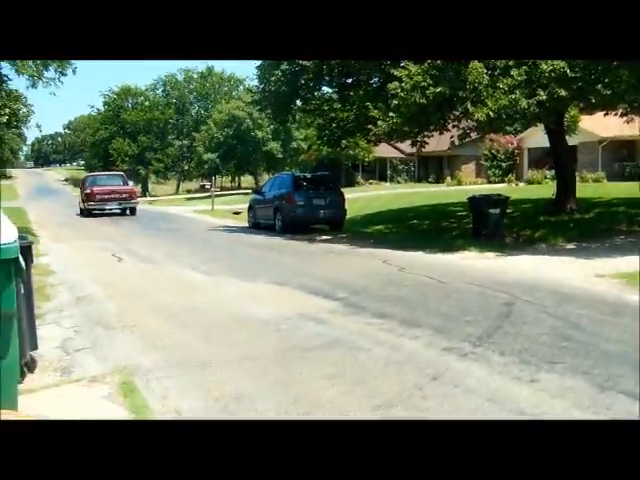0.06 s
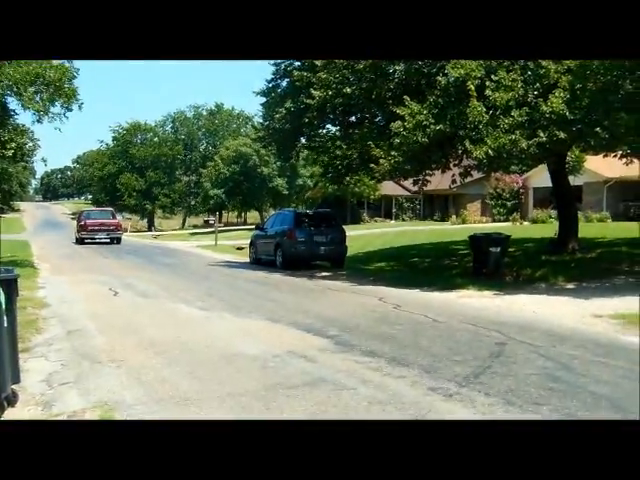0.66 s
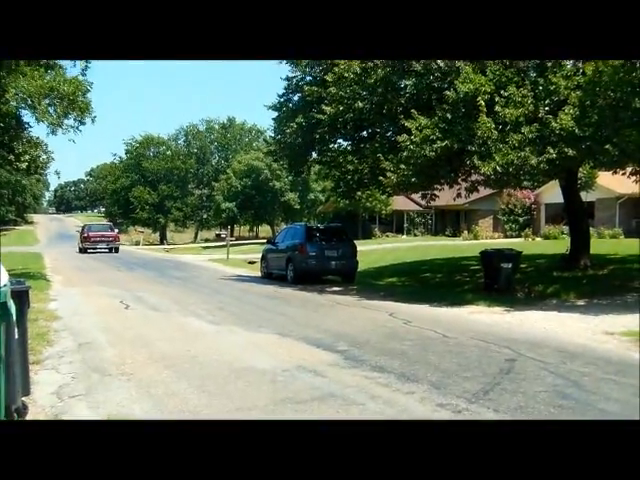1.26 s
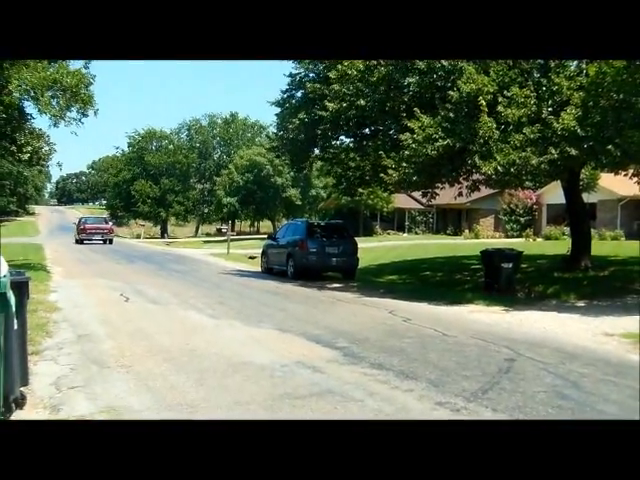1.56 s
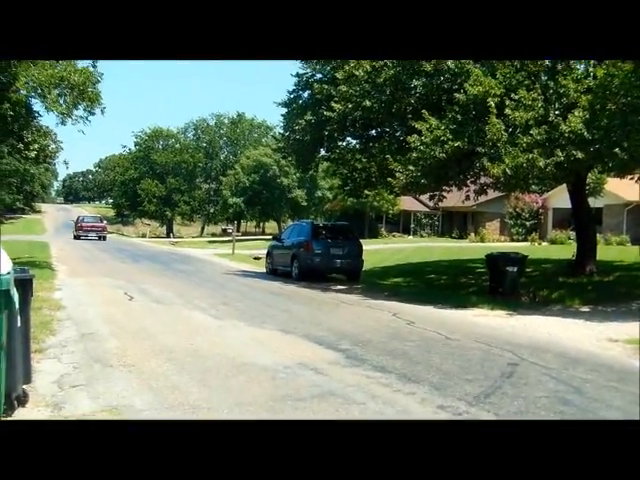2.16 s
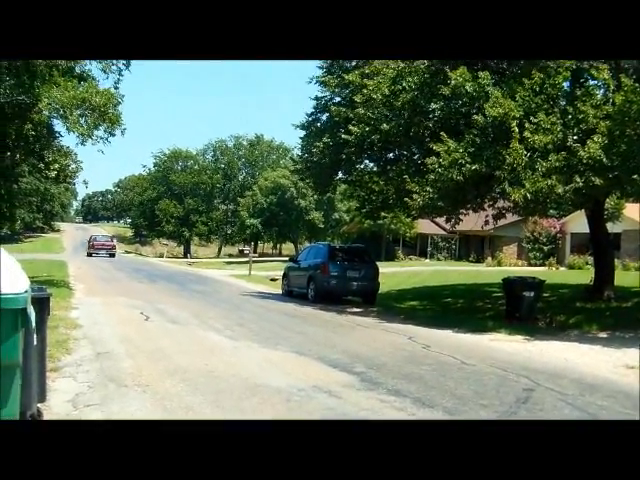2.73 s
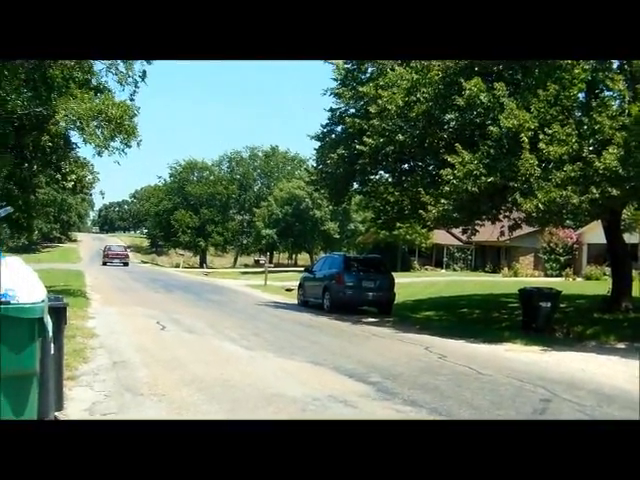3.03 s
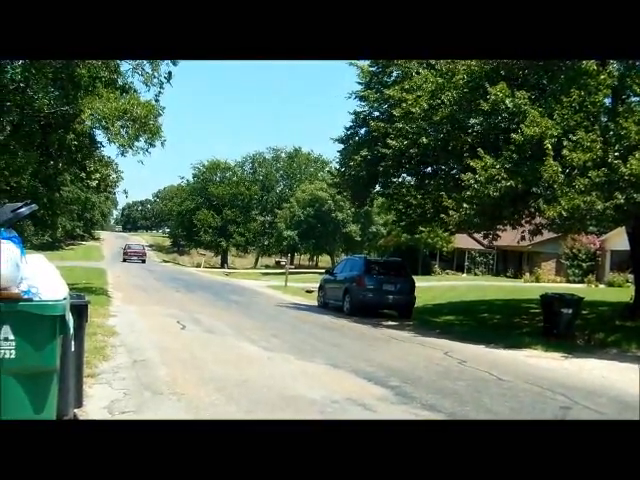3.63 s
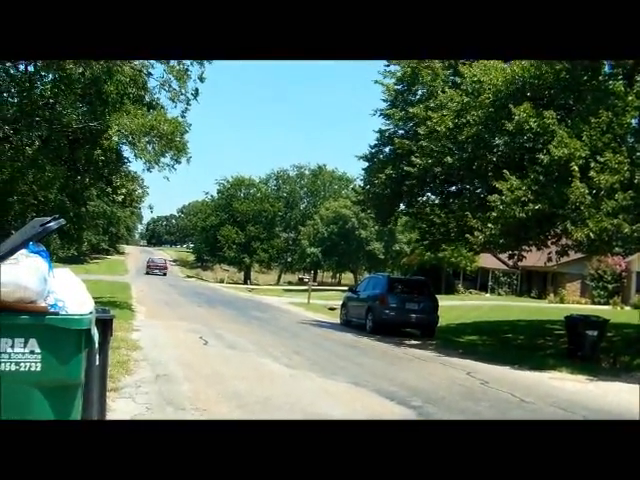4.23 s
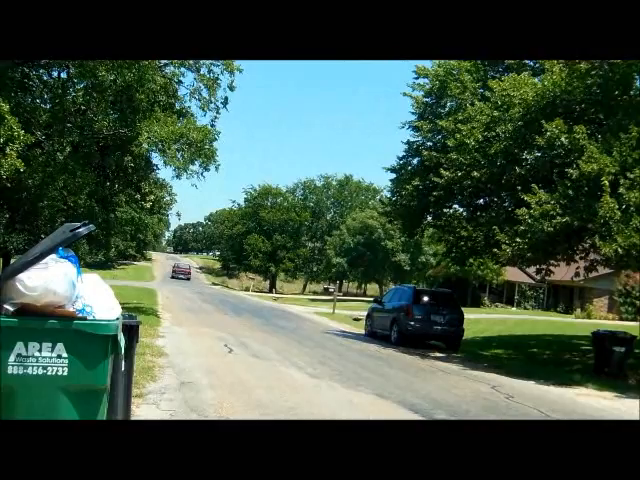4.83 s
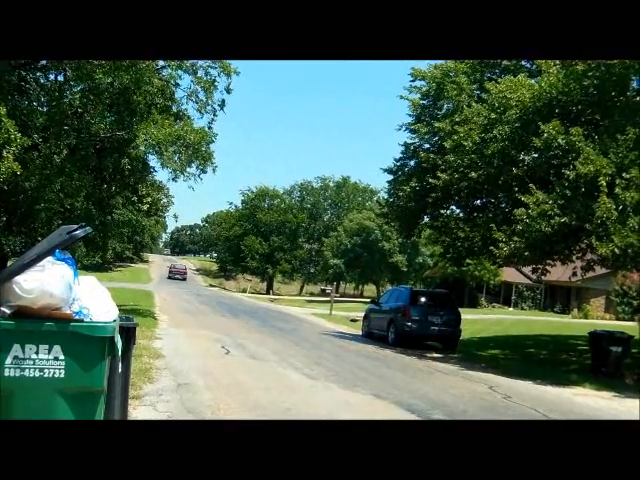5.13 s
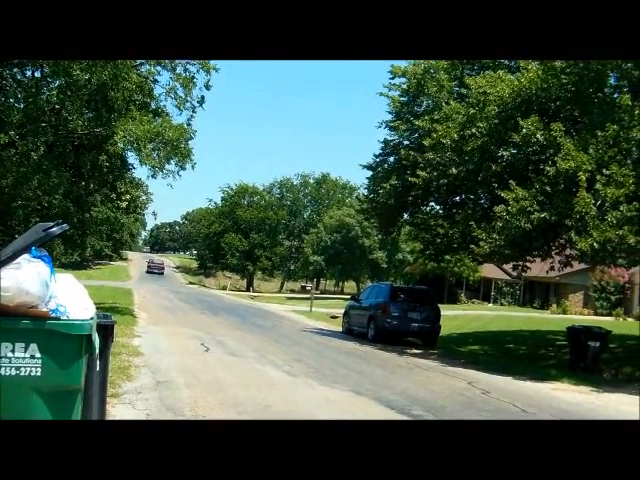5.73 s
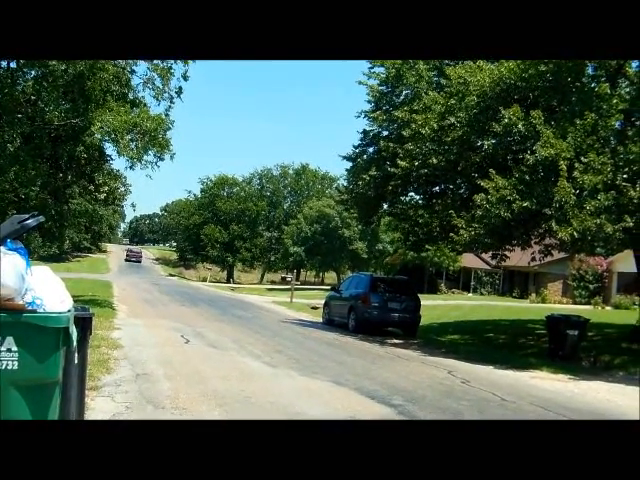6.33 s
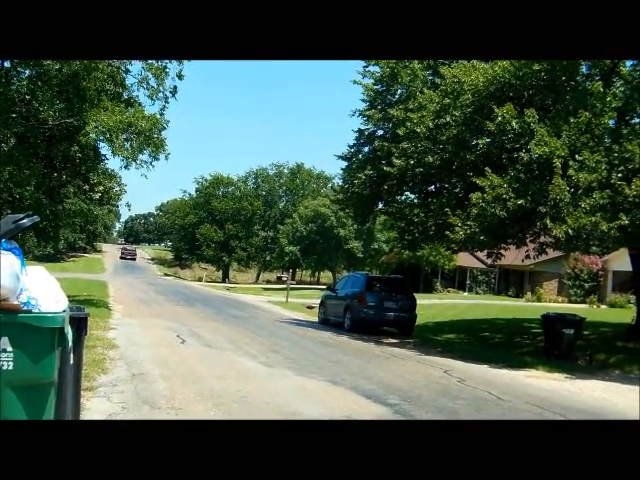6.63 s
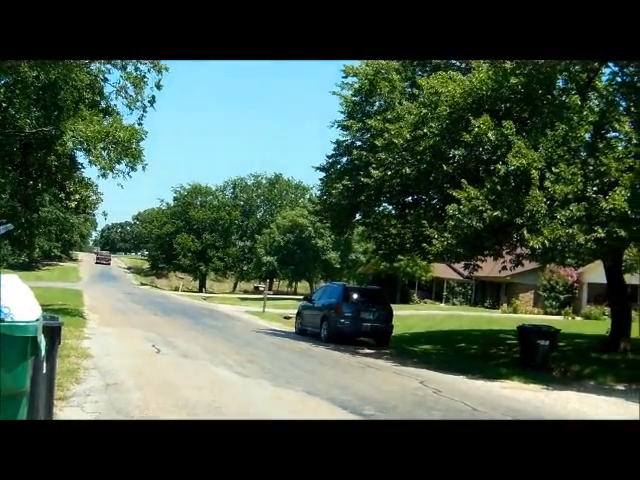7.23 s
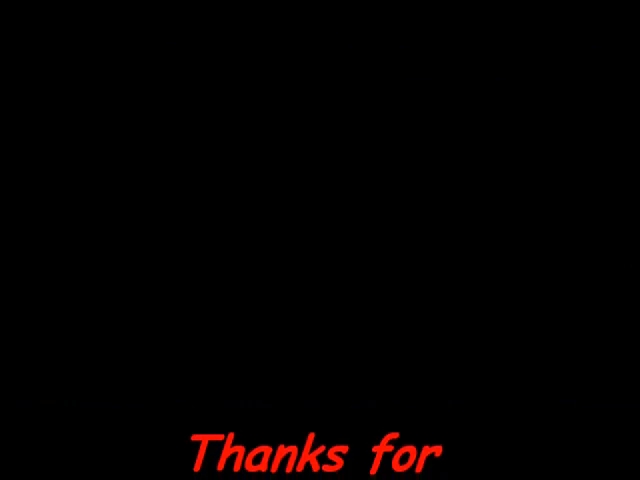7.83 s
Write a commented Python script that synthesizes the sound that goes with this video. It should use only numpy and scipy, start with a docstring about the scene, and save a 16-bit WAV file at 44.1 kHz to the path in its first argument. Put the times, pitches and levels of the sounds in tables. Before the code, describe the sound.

Heard on a hand-held microphone in a light breeze, a pickup runs roughly as it pulls away, with booming, uneven firings, sharp spits of gas and metallic rattling. About halfway through, the engine evens out and hums at higher revs, its turbo softly whistling. Houses along the street return a dull echo. Thin bird-like chirps and a sharp tick come near the abrupt end.

```python
"""A turbocharged V8 pickup drives away down a tree-lined street, heard from behind.
For four seconds the engine stutters, its exhaust chugging, barking and spitting; then it pulls cleanly
at higher revs. Uneven firings boom and ring in the pipe, gas hisses out and loose metal rattles.
Houses echo, faint chirps and ticks come through, and wind nudges the microphone of a hand-held camera.
At the end the sound cuts off."""
import sys
import numpy as np
from scipy import signal
from scipy.fft import rfft, irfft, next_fast_len
from scipy.io import wavfile
from scipy.ndimage import uniform_filter1d, minimum_filter1d

SR = 44100
rng = np.random.default_rng(int(sys.argv[2]) if len(sys.argv) > 2 else 0)


def persist_wave(psi):
    """Save psi, clipped to +-1, as 16-bit WAV."""
    counts = np.round(np.clip(psi, -1, 1) * 32767).astype(np.int16)
    wavfile.write(sys.argv[1], SR, np.atleast_2d(counts).T)


N = 356306
TIME = np.arange(N) / SR

# Engine speed. Each row: time in seconds, firings per second.
FIRING_RATE = [(0, 88.84), (.5, 88.7), (1.5, 84.83), (2.25, 89.33), (2.75, 86.42), (3.2, 88.62),
               (3.45, 92.28), (3.75, 89.18), (4.17, 98.97), (4.37, 94.35), (4.62, 102.49), (5.25, 109.02),
               (5.75, 109.52), (6.17, 103.34), (6.62, 108.15), (6.9, 106.09), (7.2, 103.38), (7.45, 105.06)]
# How roughly the engine runs. Each row: time in seconds, stutter from 0 (even) to 1 (ragged).
ROUGHNESS = [(0, 0.36), (0.301, 0.58), (1.1, 0.69), (2.15, 0.52), (2.9, 0.51), (3.5, 0.58), (4.4, 0.091),
             (4.75, 0.094)]
# How hard the engine works. Each row: time in seconds, effort in dB.
ENGINE_EFFORT = [(0, 2), (0.399, -1.5), (1, -1), (1.6, 1), (2.199, 3.5), (2.9, -1.5), (3.5, 3.5), (4.15, 2),
                 (4.7, -5.5), (6.1, -3.5), (6.35, -0.5), (6.7, 2.5), (7.1, 0), (7.45, 1)]
# The cylinders in firing order; their two banks reach the tailpipe unevenly.
# Each row: delay in firing intervals, boom in dB, rasp in dB.
CYLINDER_BEAT = [(-0.056, -0.5, -0.5), (0.0515, -0.5, -2.5), (-0.201, 3, 1.5), (0.042, -2, 2),
                 (0.0514, 1, -1), (-0.046, 4, 1.5), (0.254, -4.5, -0.5), (-0.097, 2.5, 2.5)]
# Extra hard firings. Each row: time in seconds, then bark, spit and clack, each in dB.
HARD_FIRINGS = [(.084, -46, -39, -44), (.184, -36, -41, -40), (.266, -45, -35, -36),
                (.364, -32.5, -37, -39), (.623, -42.5, -30, -41), (.711, -38.5, -33, -43.5),
                (.769, -31.5, -40.5, -37.5), (0.894, -27, -30.5, -36.5), (.961, -48.5, -28.5, -36.5),
                (1.037, -41, -32.5, -39.5), (1.079, -44, -29.5, -33.5), (1.153, -40, -36, -43),
                (1.326, -32, -33, -44), (1.368, -27.5, -37, -32), (1.519, -32, -36, -35.5),
                (1.558, -41, -37, -37), (1.638, -38.5, -30.5, -33), (1.744, -29, -35.5, -45),
                (1.78, -34.5, -45.5, -48.5), (1.926, -23.5, -32.5, -34), (1.968, -26, -40.5, -37),
                (2.107, -29, -34, -38), (2.287, -25.5, -31.5, -30), (2.368, -39, -33.5, -43),
                (2.467, -27, -41.5, -44), (2.55, -47, -33, -41), (2.646, -25, -28, -34),
                (2.835, -21, -33, -30.5), (2.92, -26, -35, -41), (3.106, -26.5, -51, -47),
                (3.295, -26.5, -39, -52), (3.4, -25, -41, -53), (3.465, -31, -39, -48),
                (3.645, -29, -52, -45), (3.752, -23, -38, -45), (3.81, -30, -34, -41)]
# The engine misses. Each row: time in seconds, dip in dB, half length in seconds.
MISFIRES = [(0.08, 6, 0.092), (.68, 3, .022), (0.863, 3.5, .02), (0.988, 3, 0.021), (1.225, 4.5, 0.018),
            (1.413, 5, 0.018), (1.652, 4.5, 0.037), (2, 4.5, .025), (2.562, 6.5, .009), (2.7, 2.5, 0.014),
            (3.014, 4.5, 0.0067), (3.233, 6, 0.04), (3.67, 3.5, 0.016), (3.92, 3, 0.028)]
# How the exhaust shapes one firing. Each row: frequency in Hz, gain in dB.
EXHAUST_SHAPE = [(25, -35.5), (60, -7.5), (80, -5.5), (100, 1.5), (122, -0.5), (145, 4), (175, 2),
                 (210, -8), (235, -8), (268, 1), (305, -11), (380, -28), (470, -32), (600, -35.5),
                 (1200, -47), (8000, -103.5)]
# Where the tailpipe rings. Each row: pitch in Hz, width in Hz, gain in dB.
PIPE_RINGS = [(374, 115, -1.5), (707.6, 43.4, 3), (785, 75, 2), (849, 63, 2), (1015, 89, -5)]
# The low tones of steady running, and the high ones that sing when the turbo is pushing (boost).
# Each row: multiple of the engine cycle rate (a cycle is eight firings), relative level in dB.
DRONE_TONES = [(3, -26), (4, -32.5), (5, -21), (6, -37), (7, -29), (8, -3), (9, -20.5), (10, -11.5),
               (11, -6), (12, -18.5), (13, -9.5), (14, -16.5), (15, -24.5), (16, -12), (17, -31.5),
               (18, -16), (19, -20.5), (20, -16.5), (21, -12), (22, -18.5), (23, -19.5), (24, -18.5),
               (25, -21), (26, -28.5), (27, -34), (28, -33), (36, -38.5), (37, -34), (38, -33), (40, -35.5)]
SINGING_TONES = [(51, -8.5), (52, 4), (53, -6.5), (54, -9), (58, -16), (60, -11), (65, 0), (66, -6.5),
                 (68, -7.5), (70, 0.5), (76, -11), (79, -7), (81, -5)]
# The clean hum at the firing rate, the once-a-cycle chug and the pipe's hollow note.
# Each row: time in seconds, base level in dB.
HUM_LEVEL = [(0, -42), (.35, -18), (.7, -32.5), (2.2, -35), (2.6, -23), (3.5, -19.5), (4.1, -26),
             (4.6, -24.5), (7.45, -32.5)]
CHUG_LEVEL = [(0, -32), (.55, -34), (.9, -29), (1.4, -30.5), (2.3, -25), (2.8, -29), (3.2, -28.5),
              (4.1, -27), (4.8, -31), (7.45, -24.5)]
HOLLOW_LEVEL = [(0, -20.5), (.4, -21), (1.1, -23.5), (2.2, -21.5), (3.3, -19), (3.8, -26), (4.4, -34),
                (4.8, -60)]
# The hollow note's two beats. Each row: place in the cycle in firing intervals, gain in dB.
HOLLOW_BEATS = [(4.5, 0), (7.3, -1.7)]
# Heavy chugs on that note. Each row: time in seconds, level in dB, half length in seconds.
HOLLOW_CHUGS = [(0.914, -19.5, 0.019), (1.331, -18, 0.027), (1.514, -19.5, .018), (1.928, -22, 0.011),
                (2.113, -22, 0.02), (2.294, -22, .012), (2.356, -20.5, 0.011), (2.432, -17.5, 0.011),
                (2.616, -20.5, 0.013), (2.838, -19, 0.018), (3.074, -18, 0.01), (3.12, -20, .013),
                (3.364, -21, .016), (3.424, -18, .014), (3.964, -20.5, 0.011)]
# Gas noise of a hard firing, of the stutter and of boost. Each row: frequency in Hz, gain in dB.
SPIT_SHAPE = [(600, 0.5), (1500, -0.5), (3000, 0.5), (4200, 5.5), (6000, 0.5), (7500, 1.5), (9800, 4.5),
              (11300, 0), (14000, -11)]
CHUFF_SHAPE = [(500, 3.5), (1000, 3.5), (1250, 6.5), (1550, 11.5), (2050, 1.5), (2500, 7), (2900, -0.5),
               (3250, 2), (4100, -1), (6600, -16.5), (9500, -13), (11300, -10.5), (14000, -26.5)]
HISS_SHAPE = [(300, 0), (1000, 11.5), (1250, 4.5), (1700, 6), (2150, 0.5), (2850, 0), (3400, 0), (3800, 1),
              (4250, 0.5), (5600, -1), (6600, -5), (10300, -5.5), (14000, -17.5)]
# Ringing loose metal, and the turbo's breath. Each row: pitch in Hz, width in Hz, relative level in dB.
METAL_RINGS = [(1540, 180, -5), (2552, 150, 3.5), (3240, 220, 0), (4035, 170, 0), (5230, 300, -3.5)]
TURBO_BANDS = [(1780, 340, -3), (2280, 530, 0), (3334, 380, 1), (4150, 190, -2.5)]
# Faint chirps. Each row: time in seconds, level in dB, pitch in Hz, half length in seconds.
FAINT_CHIRPS = [(.095, -41, 2580, 0.026), (6.255, -37, 3460, 0.012), (6.557, -38.5, 3470, .01),
                (6.685, -40.5, 3300, .01), (6.735, -40, 3360, .01), (6.815, -36.5, 3330, 0.016),
                (7.042, -38.5, 3290, .01), (7.085, -38.5, 3460, .01)]
# The wind's rumble. Each row: frequency in Hz, gain in dB.
WIND_SHAPE = [(3, -42), (14, -7), (25, -1.5), (50, 5), (100, 7), (300, -18.5), (1000, -44.5)]
# Gusts. Each row: time in seconds, strength in dB, half length in seconds.
WIND_GUSTS = [(.42, -46, 0.17), (1.307, -33, 0.033), (1.59, -28, 0.086), (1.976, -26, 0.26),
              (3.026, -22.5, 0.052), (3.42, -24, 0.17), (4.526, -21.5, 0.066), (5.55, -23, 0.11),
              (5.775, -23.5, 0.054), (7.161, -26, 0.046)]
# Sharp ticks. Each row: start in seconds, level in dB, pitch in Hz, width in Hz, decay in seconds.
SHARP_TICKS = [(4.865, -34, 7950, 600, 0.014), (4.94, -30, 7770, 700, 0.013),
               (7.28, -16, 8500, 7000, 0.0013)]

BOOM_DB, RASP_DB, HISS_DB = -12.9, -31.5, -32.5  # base levels, before effort and stutter
THROB_DB, SING_DB, WHISTLE_DB = -30, -33.5, -38.5  # base levels of the sounds that come with boost


def truck(bark_hz=845, turbulence=1.87, puff_s=.017):
    """Firings boom and ring in the exhaust, and a puff of gas follows each. Effort drives the levels."""
    firing_hz, stutter, effort_db = curve(FIRING_RATE), curve(ROUGHNESS), curve(ENGINE_EFFORT)
    sag_db = -sum(depth_db * swell(s, length) for s, depth_db, length in MISFIRES)
    boom_db = BOOM_DB + .25 * effort_db + sag_db - 4.5 * stutter
    rasp_db = RASP_DB + .72 * effort_db + .87 * sag_db - 3 * stutter
    hiss_db = HISS_DB + .3 * effort_db + .74 * sag_db
    # a running count of firings; the crank turns less evenly in the stutter
    fired = -.87 + np.cumsum(firing_hz) / SR + .018 * np.sqrt(stutter) * drift(25)
    bark, spit, clack, push = hard_firings()
    thumps, cracks = firings(fired, stutter, surge=np.sqrt(bark / bark.max()))
    boom = exhaust_boom(thumps, fired, stutter) * from_db(boom_db) + hollow_note(fired, sag_db)
    chug = whoop(fired, firing_hz, at=.094, hz=342, rise_hz_per_s=3800, half_s=.0096,
                 phase_spread=.22 + stutter)
    chug *= np.hypot(from_db(curve(CHUG_LEVEL) + 2 * sag_db), push)
    throb = whoop(fired, firing_hz, at=1.1, hz=893, rise_hz_per_s=2700, half_s=.0086, phase_spread=.56)
    throb *= from_db(THROB_DB + .7 * effort_db)
    puffs = level_out(add_tail(cracks, puff_s))
    blast = level_out(cracks) + turbulence * puffs * rng.standard_normal(N)
    # high tones swell as the revs carry them to a pitch where the pipe rings
    song = normalize(tailpipe(engine_tones(fired, SINGING_TONES, waver_db=2)))
    song *= from_db(SING_DB + .41 * effort_db)
    rasp = level_out(tailpipe(blast)) * np.hypot(from_db(rasp_db), bark * from_db(-7.5))
    bark_ring = tone(bark_hz, wobble=.02785, rate=130) * bark * from_db(-2)
    boost = 1 - stutter
    pipe = boom + chug + rasp + bark_ring + (song + throb) * boost ** 3
    gas = exhaust_gas(puffs, stutter, hiss_db, spit)
    return pipe + gas + rattle(puffs, stutter, clack) + turbo(effort_db, boost, puffs)


def firings(fired, stutter, surge, jitter=.062, surge_db=3):
    """Eight cylinders fire in turn, less evenly in the stutter. Gives pulses for boom and for rasp."""
    number = np.arange(int(fired[-1]) - 1)
    lag, boom_db, rasp_db = np.array(CYLINDER_BEAT)[number % len(CYLINDER_BEAT)].T
    time_luck, strength_luck, rasp_luck = rng.standard_normal((len(number), 3)).T
    ragged, hard = np.interp(number, fired, stutter), np.interp(number, fired, surge)
    at = np.interp(number + lag + jitter * np.sqrt(ragged) * time_luck, fired, np.arange(N))
    strength_db = (1 + 5 * np.sqrt(ragged)) * np.minimum(strength_luck, .6) + surge_db * hard
    thumps = from_db(strength_db + boom_db * (1 + ragged))
    cracks = from_db(strength_db / 3 + rasp_db * (1.5 - .67 * ragged) + 2.5 * rasp_luck)
    # each pulse is shared between the two nearest samples
    whole, part = at.astype(int), at % 1
    return [np.bincount(whole, size * (1 - part), N) + np.bincount(whole + 1, size * part, N)
            for size in (thumps, cracks)]


def hard_firings(bark_lag_s=.0045, push_lag_s=.015):
    """Loudness curves for a hard firing's round bark, spit of gas, metal clack and push on the chug."""
    bark = spit = clack = push = 0
    for s, bark_db, spit_db, clack_db in HARD_FIRINGS:
        bark += from_db(bark_db) * swell(s + bark_lag_s, .0105)
        spit += from_db(spit_db) * flare(s, rise_s=.002, decay_s=.0135)
        clack += from_db(clack_db) * flare(s, rise_s=.002, decay_s=.018)
        push += from_db(bark_db) * swell(s + push_lag_s, .02)
    return bark, spit, clack, push


def exhaust_boom(thumps, fired, stutter, settle_below=.25):
    """The exhaust's low voice: lumpy thumps give way to a clean drone as the stutter dies down."""
    lumps = level_out(colour(thumps, EXHAUST_SHAPE))
    lumps *= stutter ** .6 * np.minimum(stutter / settle_below, 1)
    drone = engine_tones(fired, DRONE_TONES, waver_db=3) * (1 - stutter) * from_db(-2.5)
    # the pipe lifts whichever tone passes through its resonance, more so under load
    drone += resonate(drone, hz=272, width=9) * from_db(-5 + .3 * curve(ENGINE_EFFORT))
    hum = np.sqrt(2) * np.cos(2 * np.pi * fired) * from_db(curve(HUM_LEVEL) - BOOM_DB)
    return -level_out(lumps + drone + hum)


def engine_tones(fired, table, waver_db, smear=.06):
    """Clean multiples of the engine cycle, timed by the cylinders' uneven beat. Weak ones waver most."""
    lag, boom_db, _ = np.transpose(CYLINDER_BEAT)
    count = len(CYLINDER_BEAT)
    moments = (np.arange(count) + lag) / count
    cycle, out = fired / count, 0
    for multiple, db in table:
        phase = np.angle(np.sum(from_db(boom_db) * np.exp(-2j * np.pi * multiple * moments)))
        # the pipe smears the timing of tones above twice the firing rate
        phase -= smear * max(multiple - 2 * count, 0) ** 2
        drift_db = waver_db * np.clip(.3 - db / 20, .3, 1) * drift(9)
        out += from_db(db + drift_db) * np.cos(2 * np.pi * multiple * cycle + phase)
    return normalize(out)


def hollow_note(fired, sag_db, hz=265, beat_width=.92):
    """The uneven banks sound the pipe's hollow note twice a cycle; heavy chugs boom on it too."""
    count, beats = len(CYLINDER_BEAT), 0
    for at, db in HOLLOW_BEATS:
        firings_away = (fired - at + count / 2) % count - count / 2
        beats += from_db(db) * np.exp(-.5 * (firings_away / beat_width) ** 2)
    beats *= from_db(curve(HOLLOW_LEVEL) + sag_db)
    heavy = sum(from_db(db) * swell(s, length) for s, db, length in HOLLOW_CHUGS)
    return tone(hz, wobble=.02006, rate=40) * np.hypot(beats, heavy)


def whoop(fired, firing_hz, at, hz, rise_hz_per_s, half_s, phase_spread, scatter_db=2):
    """A short rising ring of the exhaust, `at` firings into every cycle, a bit different each time."""
    count = len(CYLINDER_BEAT)
    cycle, place = np.divmod(fired - at + count / 2, count)
    age = (place - count / 2) / firing_hz
    phase_luck, level_luck = rng.standard_normal((N // 1000, 2))[cycle.astype(int)].T
    phase = 2 * np.pi * (hz + rise_hz_per_s * age / 2) * age + phase_spread * phase_luck
    loudness = from_db(scatter_db * level_luck) * np.exp(-.5 * (age / half_s) ** 2)
    return np.sqrt(2) * loudness * np.cos(phase)


def tailpipe(x):
    """The metal pipe rings at a few pitches and muffles what lies between them."""
    return sum(from_db(db) * resonate_twice(x, hz, width) for hz, width, db in PIPE_RINGS)


def exhaust_gas(puffs, stutter, hiss_db, spit, sputter_db=-48.5):
    """Gas leaves the pipe in puffs: it chuffs and spits in the stutter and hisses under boost."""
    # the highest noise is the least alike in left and right
    gas = stereo_noise([(400, -13), (1000, -19.5), (2000, -17), (4000, -5.5), (12000, -2)])
    gas *= level_out(puffs + .94)  # puffs on top of a smooth flow
    chuff, hiss, crack = (normalize(colour(gas, shape))
                          for shape in (CHUFF_SHAPE, HISS_SHAPE, SPIT_SHAPE))
    # the top of the hiss wanders by about 1 dB
    hiss += resonate(hiss, hz=9000, width=6000) * (from_db(drift(4)) - 1)
    flow = stutter * driving_off(start_db=1) * chuff + (1 - stutter) * from_db(3) * hiss
    # each spit is a cluster of fine crackles; stray sputters fall in between
    spits = spit * from_db(3) * crackle(per_s=1600, decay_s=.0022, scatter_db=2.5)
    sputter = stutter * from_db(sputter_db) * crackle(per_s=30, decay_s=.0064, scatter_db=1.5)
    return flow * from_db(hiss_db) + crack * (spits + sputter)


def rattle(puffs, stutter, clack):
    """Ragged firings shake loose metal into short rings; hard firings make it clack."""
    knocks = rng.standard_normal((2, N)) * puffs
    rings = flickering_bands(knocks, METAL_RINGS, flicker_db=3, rate=13)
    return rings * stutter * np.hypot(driving_off(start_db=-41), clack * from_db(8))


def turbo(effort_db, boost, puffs):
    """The turbo's breathy, pulsing whistle grows with effort once the boost is up."""
    air = stereo_noise([(2000, -8), (4000, -3)]) * puffs
    whistle = flickering_bands(air, TURBO_BANDS, flicker_db=1, rate=14)
    return whistle * boost ** 2 * from_db(WHISTLE_DB + effort_db)


def driving_off(start_db, db_per_s=-2.14):
    """A falling gain: the chuffing and rattling fade as the truck drives away."""
    return from_db(start_db + db_per_s * TIME)


def street(x, echo_db=-16, die_away_s=.51, dull_hz=1500, count=60):
    """House fronts, trees and a parked car throw back scattered, dull echoes."""
    delay, size = rng.uniform(.013, .35, count), rng.standard_normal(count)
    echoes = np.bincount((delay * SR).astype(int), size * from_db(-60 * delay / die_away_s))
    wet = signal.fftconvolve(x, echoes[None] / np.linalg.norm(echoes), axes=-1)[:, :N]
    return x + from_db(echo_db) * signal.sosfilt(signal.butter(1, dull_hz, fs=SR, output="sos"), wet)


def wind(rumble_db=-1, knock_db=-17):
    """A breeze rumbles on the microphone, and the hardest gusts knock on it."""
    calm_db = -12 * swell(6.5, .62)  # one calm spell near the end
    breeze = from_db(-25 - 3.5 * drift(5.6) + calm_db)
    gusts = sum(from_db(db) * swell(s, length) for s, db, length in WIND_GUSTS)
    rumble = normalize(colour(stereo_noise([(20, -23.5), (200, -8.5)]), WIND_SHAPE))
    rumble *= np.hypot(breeze, gusts) * from_db(rumble_db)
    knock_shape = [(4, -34.5), (18, 1), (45, -13), (120, 1.5), (300, -15), (900, -36.5), (3000, -54)]
    knocks = normalize(colour(stereo_noise([(20, -10), (300, -16)]), knock_shape))
    return rumble + knocks * (gusts / gusts.max()) ** 2 * from_db(knock_db)


def chirps():
    """Thin, bird-like chirps: short swells of a wobbling note."""
    return sum(from_db(db) * swell(s, length) * tone(hz, wobble=.022, rate=500)
               for s, db, hz, length in FAINT_CHIRPS)


def ticks():
    """Bright ticks: bursts of high noise that die away at once."""
    out = 0
    for s, db, hz, width, decay in SHARP_TICKS:
        shape = (TIME >= s) * np.exp(-np.abs(TIME - s) / decay)
        out += from_db(db) * shape * normalize(resonate(rng.standard_normal((2, N)), hz, width))
    return out


def microphone(x, lag_samples=.64, right_louder_db=.84):
    """The sound reaches the right side a moment after the left, and slightly louder."""
    size = next_fast_len(N + 2)
    delay = np.exp(-2j * np.pi * np.fft.rfftfreq(size) * lag_samples)
    right = irfft(rfft(x[1], size) * delay, size)[:N]
    return np.array([x[0] * from_db(-right_louder_db / 2), right * from_db(right_louder_db / 2)])


def from_db(db):
    """Turn decibels into a gain."""
    return 10 ** (np.asarray(db) / 20)


def curve(table):
    """Join (seconds, value) rows with straight lines, giving a value for every sample."""
    return np.interp(TIME, *np.transpose(table))


def normalize(x):
    """Scale to an average level (rms) of 1."""
    return x / np.sqrt(np.mean(x ** 2))


def level_out(x):
    """Hold the level near 1 over every half second, keeping the quick throb."""
    return x / np.sqrt(uniform_filter1d(x ** 2, SR // 2) + 1e-18)


def colour(x, points, size=8192):
    """Filter a sound so that its lows and highs follow the (Hz, dB) points."""
    hz, db = np.transpose(points)
    log_hz = np.log(np.fft.rfftfreq(size, 1 / SR) + 1)
    log_gain = np.log(from_db(np.interp(log_hz, np.log(hz), db)))
    # these steps make the filter ring only after a sound, never before it
    cepstrum = irfft(log_gain)[:size // 2]
    cepstrum[1:] *= 2
    response = irfft(np.exp(rfft(cepstrum, size)))
    return signal.fftconvolve(x, response.reshape((1,) * (x.ndim - 1) + (-1,)), axes=-1)[..., :N]


def resonate(x, hz, width):
    """Keep the sound near one pitch; the width is in Hz."""
    return signal.lfilter(*signal.iirpeak(hz, hz / width, fs=SR), x)


def resonate_twice(x, hz, width):
    """Two passes, so less gets through away from the pitch."""
    return resonate(resonate(x, hz, width), hz, width)


def flickering_bands(x, bands, flicker_db, rate):
    """Pick bands out of a noise and let each swell and fade at its own moments."""
    return normalize(sum(from_db(db + flicker_db * drift(rate)) * normalize(resonate_twice(x, hz, width))
                         for hz, width, db in bands))


def add_tail(x, seconds):
    """Give every pulse a tail that dies away."""
    return signal.lfilter([1], [1, -np.exp(-1 / (seconds * SR))], x)


def swell(s, half_s):
    """A bell-shaped rise and fall around time s."""
    return np.exp(-.5 * np.minimum(((TIME - s) / half_s) ** 2, 100))


def flare(s, rise_s, decay_s):
    """A burst around time s that starts sharply and dies away."""
    age = np.clip(TIME - s + decay_s / 2, 0, 1)
    return (1 - np.exp(-age / rise_s)) * np.exp(-age / decay_s)


def crackle(per_s, decay_s, scatter_db):
    """A loudness curve made of tiny random bursts."""
    hits = (rng.random(N) < per_s / SR) * from_db(scatter_db * np.minimum(rng.standard_normal(N), 1))
    return normalize(add_tail(hits, decay_s))


def drift(rate):
    """A random wander of about 1 either way, turning `rate` times a second."""
    knots = rng.standard_normal(int(rate * N / SR) + 2)
    return 1.358 * np.interp(TIME * rate, np.arange(len(knots)), knots)


def tone(hz, wobble, rate):
    """A note whose pitch wobbles by the given share."""
    return np.sqrt(2) * np.sin(2 * np.pi * np.cumsum(hz * (1 + wobble * drift(rate))) / SR)


def stereo_noise(side_shape):
    """Left and right noise; the (Hz, dB) points say how much the two sides differ."""
    middle, side = rng.standard_normal((2, N))
    return middle + np.array([[1], [-1]]) * colour(side, side_shape)


def scene(whine_hz=12329, whine_db=-60):
    """The truck and the chirps in the street, with wind, ticks and the camera's thin whine."""
    whine = from_db(whine_db) * normalize(np.sin(2 * np.pi * whine_hz * TIME))
    return microphone(street(truck() + chirps())) + wind() + ticks() + whine


def record(dry, end_s=7.457, ceiling=.8, top_hz=14400):
    """The camera blocks the lowest rumble, stops abruptly, turns down loud peaks and cuts the top."""
    running = np.clip((end_s - TIME) / .004, 0, 1)
    x = signal.sosfilt(signal.butter(1, 10, "high", fs=SR, output="sos"), dry) * running
    needed_gain = ceiling / np.maximum(np.abs(x).max(axis=0), ceiling)
    smooth_gain = uniform_filter1d(minimum_filter1d(needed_gain, size=700), size=700)
    return signal.sosfilt(signal.ellip(10, .2, 80, top_hz, fs=SR, output="sos"), x * smooth_gain)


dry = scene()
out = record(dry)
persist_wave(out)
```